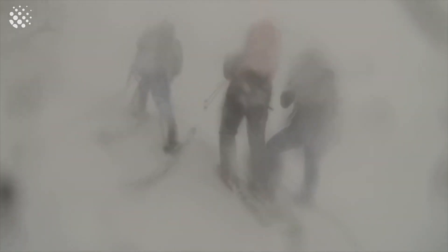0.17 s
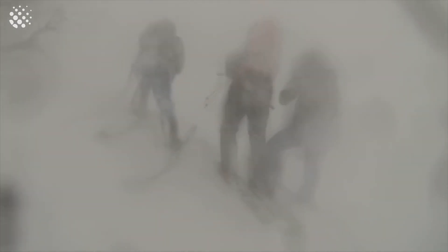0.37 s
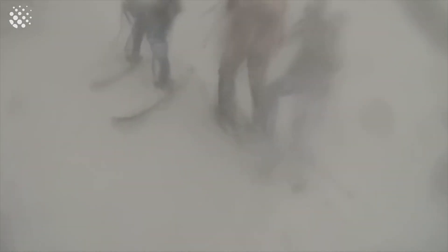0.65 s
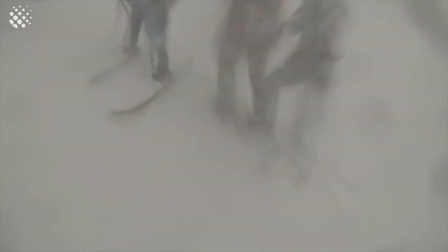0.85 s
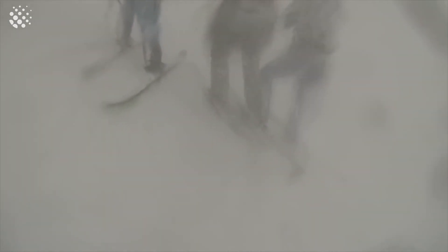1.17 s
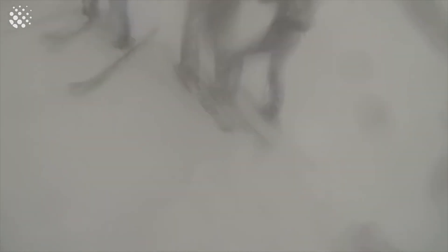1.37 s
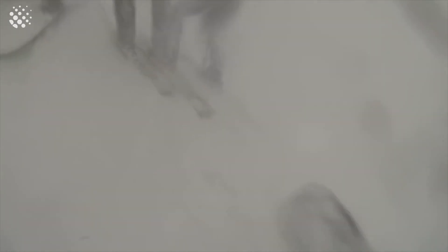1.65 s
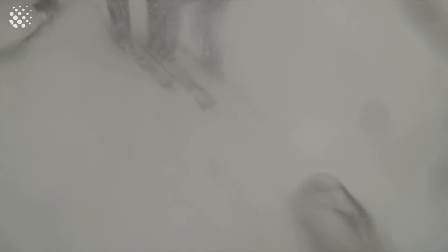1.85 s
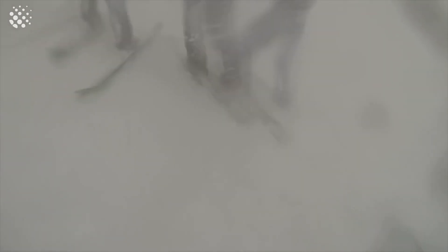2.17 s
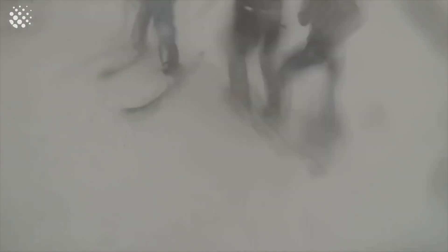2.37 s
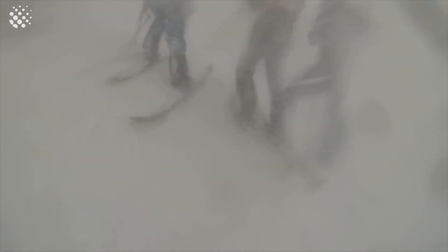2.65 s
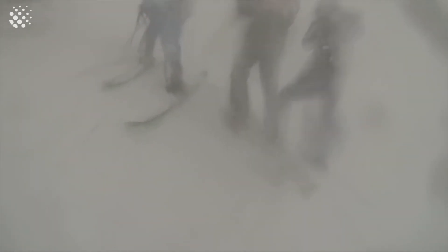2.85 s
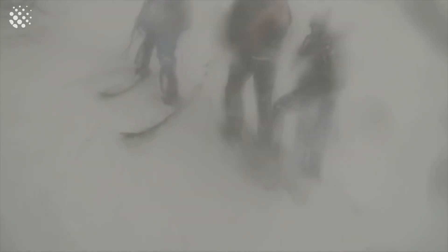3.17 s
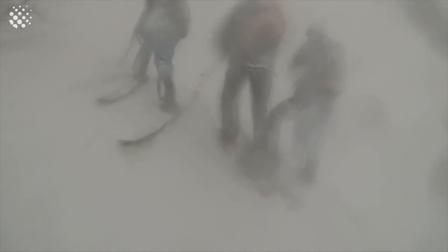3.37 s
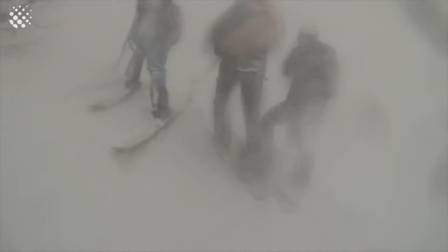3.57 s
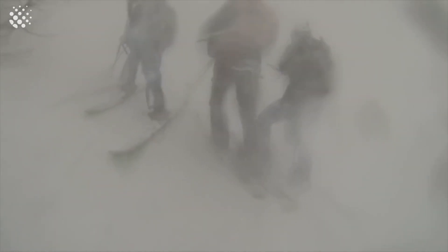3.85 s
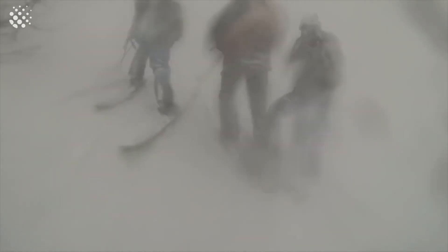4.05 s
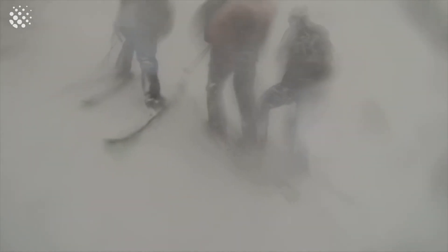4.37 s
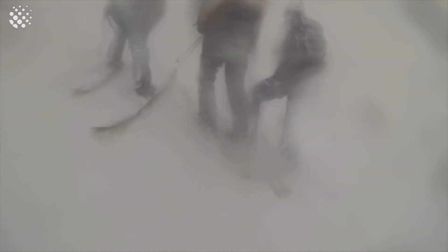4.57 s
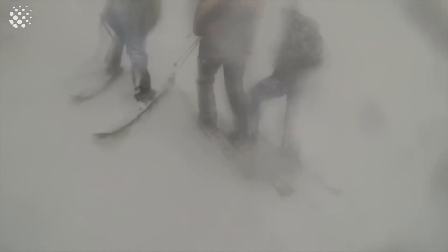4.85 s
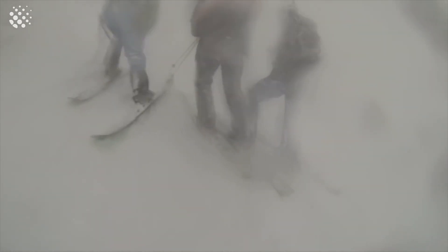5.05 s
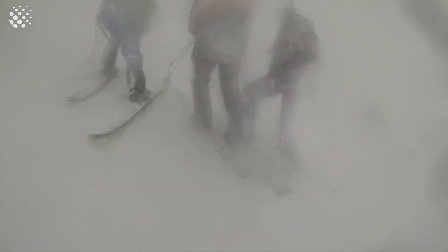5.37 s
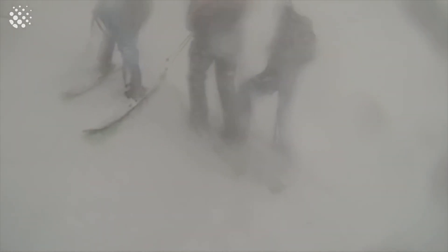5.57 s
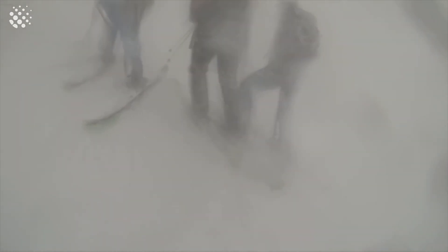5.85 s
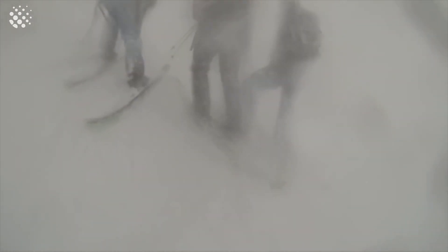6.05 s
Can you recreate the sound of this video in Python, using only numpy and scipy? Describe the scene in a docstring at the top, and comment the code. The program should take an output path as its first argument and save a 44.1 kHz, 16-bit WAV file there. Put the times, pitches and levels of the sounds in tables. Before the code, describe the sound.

Deep, lumpy wind rumble buffets a small encased camera while bursts of snow grains crackle and hiss against its plastic shell, with sharper pellet ticks.

```python
"""A powder cloud sweeps over a small camera in a closed plastic case for 6.2 s. From the start, eddies press on the
microphone membrane as a deep lumpy rumble (shaped noise and single bumps), over a faint even hiss of streaming snow.
Flurries of grains pelt the case throughout and ring its short modes, merging into a crackly hiss. Heavy pellets
stand out in the first second, crowd again from 2.4 to 3.1 s, then come more sparsely until a last cluster near 6 s.
The strongest eddies thump at 2.2 and 4.1 s."""
import sys
import numpy as np
from scipy.fft import rfft, irfft, next_fast_len
from scipy.io import wavfile
from scipy.ndimage import map_coordinates

SR = 44100
rng = np.random.default_rng(int(sys.argv[2]) if len(sys.argv) > 2 else 0)


def generate_wav(signal):
    """Clip the signal to [-1, 1] and save it as 16-bit WAV at the path in sys.argv[1]."""
    frames = np.transpose(np.atleast_2d(signal))
    scaled = np.clip(frames, -1, 1) * 32767
    pcm = np.round(scaled).astype(np.int16)
    wavfile.write(sys.argv[1], SR, pcm)


N = 273993

# wind between strong eddies, before trims: start_s [s], big_eddies_db [dB], small_eddies_db [dB]
GUST_LEVELS = [(0.0, -29, -35.5), (0.19, -31, -41.5), (1.16, -29.5, -47), (1.49, -27.5, -44),
               (1.68, -24.5, -51), (1.87, -28.5, -53), (2.23, -28, -40.5), (2.72, -27.5, -42.5),
               (3.25, -29.5, -42), (3.79, -25.5, -40), (3.98, -24, -36.5), (4.2, -28.5, -40.5),
               (4.53, -31, -42.5), (4.86, -25.5, -44), (5.1, -31.5, -47.5), (5.5, -28, -42),
               (5.83, -28.5, -43), (6.21, -30.5, -47)]
# heavy pellets, before group offsets: start_s [s], low_db [dB], middle_over_low_db [dB], upper_over_low_db [dB]
HEAVY_PELLETS = [(0.0852, -7.5, -13, -7.5), (0.1192, -17, -15, -9), (0.1999, -17.5, -13, -19),
                 (0.2355, -13, -9, -13), (0.3197, -29, -8, -22), (0.401, -26.5, -13, -12),
                 (0.5067, -33, -17, -6), (0.6145, -16.5, -28, -31), (0.6664, -23, -12, -18),
                 (0.7133, -25.5, -19, -27), (0.751, -29, -19, -18), (0.7614, -29.5, -12, -10),
                 (0.8062, -25, -14, -24), (0.9239, -10, -16, -21), (1.0865, -25, -13, -21),
                 (1.2592, -20.5, -24, -29), (1.4354, -19, -25, -20), (1.5764, -19, -9, -7),
                 (2.19, -19.5, -11, -17), (2.423, -23, -6.5, -15), (2.4994, -12, -10, -13.5),
                 (2.5449, -14, -6.5, -12), (2.6411, -15, -11, -18), (2.652, -14.5, -5, -10),
                 (2.6704, -27, -11, -16), (2.7723, -13.5, -15, -21), (2.9175, -29.5, -5.5, -12),
                 (2.948, -29, -14, -23), (2.9637, -25, -13, -17), (2.9846, -32, 0, -19),
                 (3.026, -20, -16, -24), (3.0811, -21, -21, -10.5), (3.6182, -21.5, -10, -11.5),
                 (3.7318, -26.5, -9, -13), (3.802, -13.5, -8, -6), (3.9535, -21.5, -10, -8),
                 (4.15, -17.5, -15, -16), (4.4617, -14.5, -10, -18), (4.566, -21.5, -25, -23),
                 (4.7785, -18.5, -12, -17), (4.8115, -21.5, -16, -16), (4.8883, -29, -20, -9.5),
                 (4.959, -22, -6.5, -17), (5.1539, -20, -10.5, -19), (5.3499, -13, -22, -22),
                 (5.45, -23, -14, -18), (5.702, -17.5, -26, -28), (5.9414, -21, -14.5, -25),
                 (6.0244, -20.5, -17, -12), (6.0538, -18.5, -14, -20), (6.0804, -16, -14.5, -20),
                 (6.1008, -13, -12, -17)]
# case modes: centre_hz [Hz], width_hz of one pass [Hz], level_db [dB]
CASE_MODES = [(605, 680, -22), (1034, 290, -11.5), (1500, 380, 1), (1906, 770, -8), (3040, 1280, -11),
              (3610, 1140, -13.5), (4968, 730, -13.5), (6150, 1630, -19), (7590, 1600, -19.5),
              (10400, 4700, -24.5), (13300, 3700, -26.5)]
# mode group of each case mode: group [0 low, 1 middle, 2 upper]
MODE_GROUP = [0, 0, 0, 0, 1, 1, 2, 2, 2, 2, 2]
# relative spectra of big and small eddies: freq_hz [Hz], density_db [dB per Hz]
BIG_EDDY_SPECTRUM = [(5, -19.5), (9, 6.5), (21, 0), (36, -5), (80, -13.5), (160, -39.5), (400, -53),
                     (900, -120)]
SMALL_EDDY_SPECTRUM = [(30, -51), (70, -1), (110, 1.5), (200, -9.5), (400, -22), (750, -30.5),
                       (1200, -23.5), (2500, -120)]
# single strong eddies, before trims: centre_s [s], level_db [dB]
STRONG_EDDIES = [(.058, -20.5), (.228, -21.5), (0.266, -21), (0.364, -32), (0.392, -19), (.465, -24),
                 (0.759, -32), (0.928, -19), (0.978, -20), (1.23, -19), (1.469, -28), (1.534, -25),
                 (1.593, -30), (1.66, -32), (1.799, -25), (1.917, -17.5), (2.06, -23.5), (2.17, -23),
                 (2.219, -14.5), (2.417, -28), (2.57, -25.5), (2.799, -30), (2.984, -26.5), (3.233, -18.5),
                 (3.445, -30), (3.805, -18), (3.835, -18), (3.959, -28), (4.085, -22), (4.139, -13.5),
                 (4.273, -22.5), (4.489, -17.5), (4.598, -26), (4.628, -17.5), (4.771, -24), (4.829, -25),
                 (4.907, -23), (5.027, -17.5), (5.331, -22.5), (5.603, -22.5), (6.14, -19.5)]
# flurries sweeping over the case, before trim: start_s [s], length_s [s], pelting_db [dB]
SNOW_FLURRIES = [(0.0, 0.08, -33), (0.122, .05, -28), (0.189, 0.15, -29), (0.357, 0.076, -39.5),
                 (0.44, 0.062, -41.5), (0.542, 0.1, -33), (0.695, 0.1, -49), (0.817, 0.057, -36),
                 (0.904, 0.022, -27.5), (0.974, 0.011, -31.5), (1.085, 0.14, -42), (1.19, 0.098, -30),
                 (1.344, 0.071, -38), (1.393, 0.061, -31), (1.478, .12, -32), (1.633, .19, -34.5),
                 (1.839, 0.075, -30.5), (2.019, .1, -32.5), (2.136, 0.019, -37.5), (2.189, 0.14, -31),
                 (2.444, .18, -27.5), (2.634, 0.055, -25), (2.761, 0.068, -30.5), (2.858, 0.052, -48),
                 (2.962, 0.055, -38), (3.049, 0.12, -33.5), (3.205, .1, -29.5), (3.368, 0.047, -35.5),
                 (3.441, 0.022, -43), (3.488, .07, -42.5), (3.585, .12, -36), (3.758, 0.034, -29.5),
                 (3.832, 0.1, -36), (3.929, 0.17, -35.5), (4.15, 0.038, -27), (4.22, 0.112, -34.5),
                 (4.356, .14, -29), (4.518, 0.027, -37), (4.563, 0.12, -28), (4.758, 0.035, -35.5),
                 (4.896, .045, -40), (4.964, 0.048, -31), (5.069, .2, -41.5), (5.296, 0.066, -32.5),
                 (5.447, 0.09, -27), (5.546, 0.11, -36), (5.703, 0.11, -29), (5.846, .14, -39.5),
                 (6.008, .13, -29), (6.176, 0.024, -32)]

TOP_HZ = 15200
CONTACT_HZ = 7000
ARRIVE_DB_PER_S, LEAVE_DB_PER_S = 702, 455
CALM_DB, PELTING_TRIM_DB = -70, -1.68  # calm floor between flurries, before the trim
THUMP_WIDTH_MS, THUMP_LOG_SPREAD = 4.54, 0.14
WAKE_S, WAKE_DB = 0.021, -16  # small-eddy flutter around a strong eddy
SWELL_S, SWELL_DB = 0.037, -6  # big-eddy heave around a strong eddy
LOW_DB, MIDDLE_DB, UPPER_DB = -3, 5, 10  # how readily a pellet rings each mode group
DULL_DB_PER_OCTAVE, DULL_ABOVE_HZ = 4, 5000


def amp(db):
    """Amplitude ratio of a level in dB."""
    return 10 ** (np.asarray(db) / 20)


def unit(x):
    """Scale to rms 1."""
    return x / np.sqrt(np.mean(x ** 2) + 1e-20)


def curves(rows):
    """One value per sample for each column after the time."""
    time_s, *columns = np.transpose(rows)
    return [np.interp(np.arange(N) / SR, time_s, column) for column in columns]


def wobble(knots_per_s):
    """Smooth random curve: a spline through normal-distributed knots."""
    knots = rng.standard_normal(4000)
    return map_coordinates(knots, [np.arange(N) * knots_per_s / SR])


def filtered(x, response):
    """x through a complex frequency response, zero-padded."""
    size = next_fast_len(N + 8192)
    spectrum = rfft(x, size) * response(np.fft.rfftfreq(size, 1 / SR))
    return irfft(spectrum, size)[..., :N]


def coloured(spectrum):
    """Noise of rms 1 with spectrum points joined on a log-frequency axis."""
    freq_hz, density_db = np.transpose(spectrum)

    def response(hz):
        return amp(np.interp(np.log(hz + 1), np.log(freq_hz + 1), density_db))

    return unit(filtered(rng.standard_normal(N), response))


def case_ring(at, gain_db, spot_db):
    """Blows at sample indices ring the modes; each blow's own spot sets mode strengths and signs."""
    centre_hz, width_hz, level_db = np.transpose(CASE_MODES)[:, :, None]
    spot = rng.standard_normal((len(at), 2, len(CASE_MODES))).T
    strength = amp(level_db + gain_db + spot_db * spot[:, 0]) * np.sign(spot[:, 1])
    blows = np.array([np.bincount(at, row, N)[:N] for row in strength])

    def modes(f):
        damping = 1j * f * width_hz
        one_pass = damping / (centre_hz * centre_hz - f * f + damping)
        return one_pass ** 2  # wall, then air inside

    ring = filtered(blows, modes).sum(0)
    return filtered(ring, lambda f: 1 / (1 + 1j * f / CONTACT_HZ))  # snow crumbles: soft contact


def drift():
    """Faint even hiss of snow streaming over the slope: dense steady blows, mainly on the case's lower modes."""
    at = np.arange(0, N, 4)
    group_gain_db = -6 * np.array(MODE_GROUP)[:, None]
    return amp(-59) * unit(case_ring(at, group_gain_db, spot_db=-5.0))


def thumps():
    """A strong eddy pushes or sucks the membrane once: a pointed bump less a slower swing of equal area."""
    out = np.zeros(N + SR)  # half a second of margin at each end
    t = np.arange(-2048, 2048) / SR
    for centre_s, level_db in STRONG_EDDIES:
        width_ms = THUMP_WIDTH_MS * np.exp(THUMP_LOG_SPREAD * rng.standard_normal())
        u = t * 1000 / width_ms
        point = np.exp(-np.sqrt(0.064 + 2.0 * u * u))
        back = np.exp(-.5 * ((u - 1.6) / 1.84) ** 2)
        bump = point - back * point.sum() / back.sum()
        start = round(centre_s * SR) + SR // 2 - len(t) // 2
        out[start:start + len(t)] += rng.choice([-1, 1]) * amp(level_db + 6.5) * bump
    return out[SR // 2:][:N]


def near_strong_eddies(span_s):
    """Sum of Gaussian bumps in time, one around each strong eddy."""
    t = np.arange(N) / SR
    return sum(amp(db) * np.exp(-((t - s) / span_s) ** 2) for s, db in STRONG_EDDIES)


def wind():
    """Big eddies heave the membrane, small ones flutter in short lumps; both swell around strong eddies."""
    big_db, small_db = curves(GUST_LEVELS)
    lumps = wobble(14)
    heave_level = amp(big_db + 3.0) + amp(SWELL_DB) * near_strong_eddies(SWELL_S)
    heave = heave_level * unit(amp(2.36 * lumps) * coloured(BIG_EDDY_SPECTRUM))
    flutter_level = amp(small_db - 0.3) + amp(WAKE_DB) * near_strong_eddies(WAKE_S)
    flutter_db = 1.9 * lumps + 3.1 * wobble(45)
    flutter = flutter_level * unit(amp(flutter_db) * coloured(SMALL_EDDY_SPECTRUM))
    return heave + flutter + thumps()


def pellets(count=2):
    """Heavy pellets each break in two within 1.3 ms; longer contact excites the highest modes less."""
    start_s, low_db, middle_db, upper_db = np.repeat(HEAVY_PELLETS, count, axis=0).T
    peak_db = np.array([low_db + LOW_DB, low_db + middle_db + MIDDLE_DB, low_db + upper_db + UPPER_DB])
    late = rng.random((len(HEAVY_PELLETS), count)) * np.arange(count)
    at = ((start_s + .0001 + 0.001296 * late.ravel()) * SR).astype(int)
    centre_hz, width_hz, level_db = np.transpose(CASE_MODES)
    octaves_above = np.clip(np.log2(centre_hz / DULL_ABOVE_HZ), 0, None)
    dull_db = -DULL_DB_PER_OCTAVE * octaves_above[:, None]
    # squared peak of each mode after a unit blow, summed by group
    kick_power = (2 * np.pi / np.e * width_hz / SR * amp(level_db)) ** 2
    group_db = 10 * np.log10(np.bincount(MODE_GROUP, kick_power))[:, None]
    fragment_db = -7 * np.tile(np.arange(count), len(HEAVY_PELLETS))
    gain_db = (peak_db - group_db)[MODE_GROUP] + fragment_db + dull_db
    return case_ring(at, gain_db, spot_db=1.5)


def flurry_level():
    """Each flurry arrives, holds and leaves; powers add over a calm floor, in dB."""
    start_s, length_s, level_db = np.transpose(SNOW_FLURRIES)[:, :, None]
    t = np.arange(0, N, 32) / SR
    arrive_db = ARRIVE_DB_PER_S * np.clip(start_s - t, 0, None)
    leave_db = LEAVE_DB_PER_S * np.clip(t - start_s - length_s, 0, None)
    power = (amp(level_db - (arrive_db + leave_db)) ** 2).sum(0) + amp(CALM_DB) ** 2
    return np.interp(np.arange(N) / SR, t, 10 * np.log10(power))


def pelting(count=50000):
    """Shower of small grains ringing the case: thicker flurries land more of them, in clumps."""
    level_db = flurry_level()
    when, pick, spread = rng.random((count, 3)).T
    at = (when * N).astype(int)
    eddies = 0.15 * wobble(16) + .5 * wobble(50) + .5 * wobble(200)
    clumps_db = 6.45 * np.tanh(eddies)  # a clump holds only so much snow
    share = np.clip(.5 * amp(0.94 * (level_db[at] + 32.5)), .16, 1)  # share of grains that hit
    lands = np.clip((share - pick) / (0.29 * share), 1e-5, 1)  # soft edge between hit and miss
    heavy_db = -2.66 * np.log(spread + 0.00017)  # a few grains are far heavier
    size_db = 20 * np.log10(lands / np.sqrt(share)) + heavy_db
    # the wind turns and favours other parts of the case
    side_db = 1.98 * np.array([wobble(11)[at] for _ in CASE_MODES])
    shower = case_ring(at, size_db + clumps_db[at] + side_db, spot_db=3.5)
    return amp(level_db + PELTING_TRIM_DB) * unit(shower)


def scene():
    """Sum of snow drift, wind, pellets and pelting, as one channel."""
    return (drift() + wind() + pellets() + pelting())[None]


def record(dry):
    """The camera's steep low-pass band limit."""
    return filtered(dry, lambda hz: 1 / (1 + (hz / TOP_HZ) ** 90))


dry = scene()
out = record(dry)
generate_wav(out)
```